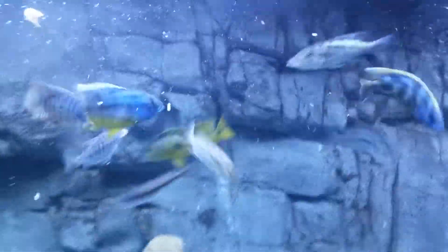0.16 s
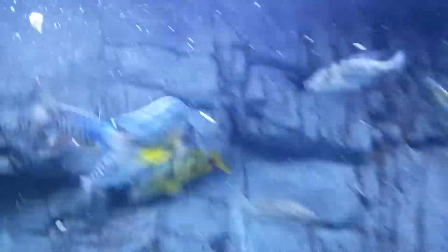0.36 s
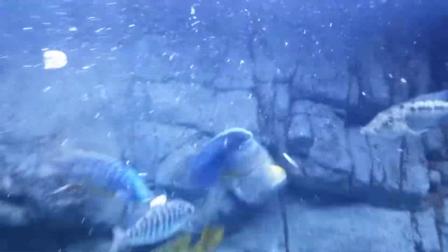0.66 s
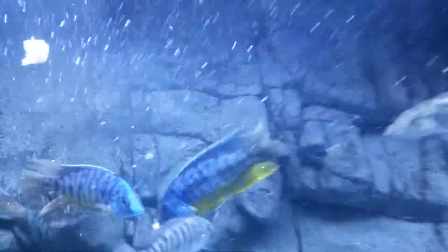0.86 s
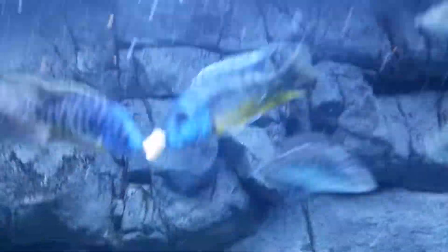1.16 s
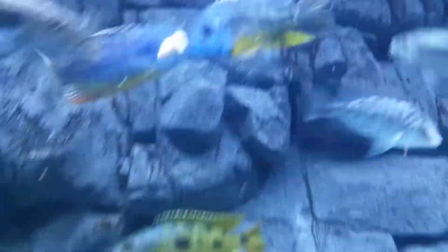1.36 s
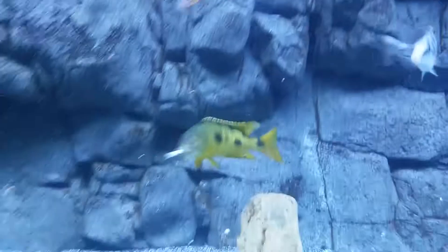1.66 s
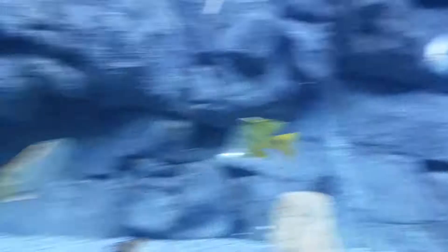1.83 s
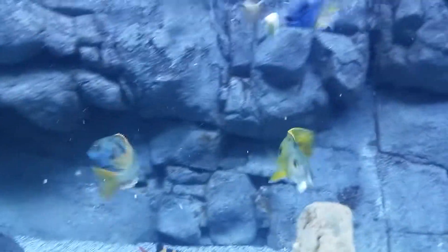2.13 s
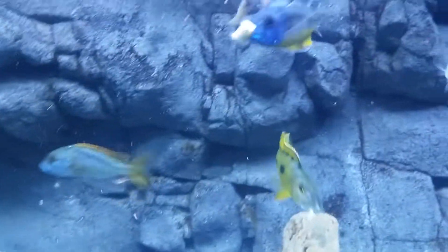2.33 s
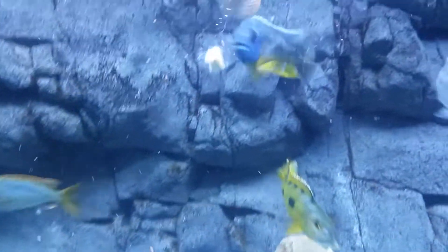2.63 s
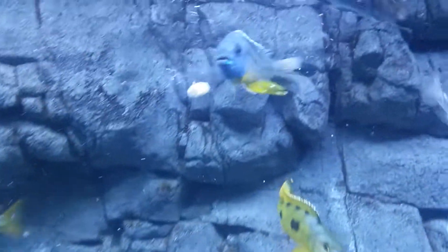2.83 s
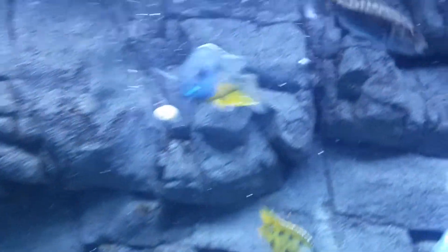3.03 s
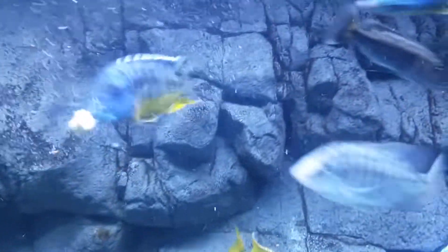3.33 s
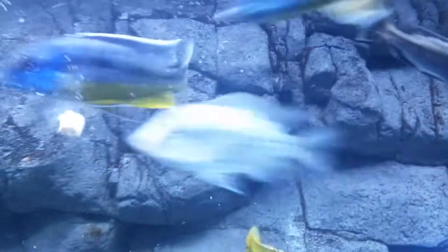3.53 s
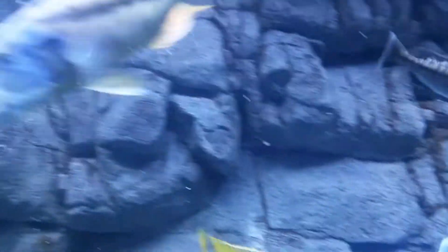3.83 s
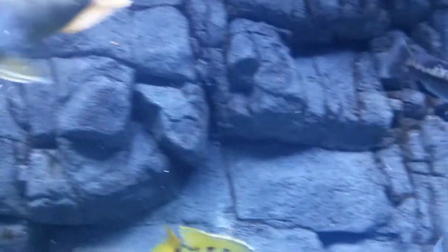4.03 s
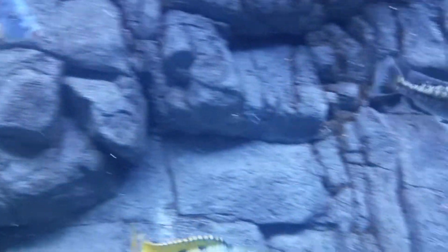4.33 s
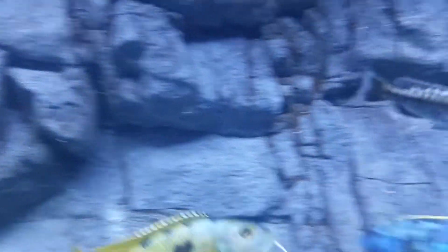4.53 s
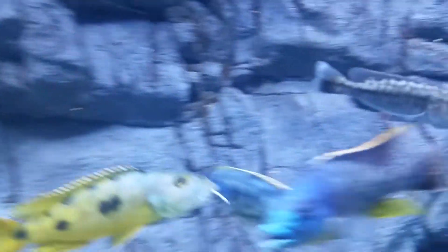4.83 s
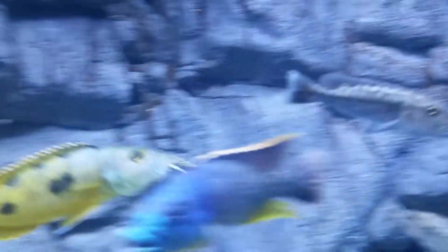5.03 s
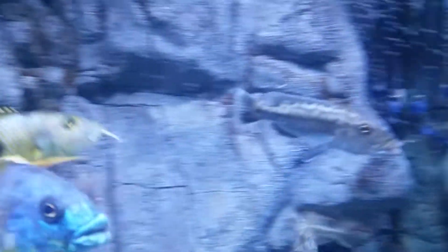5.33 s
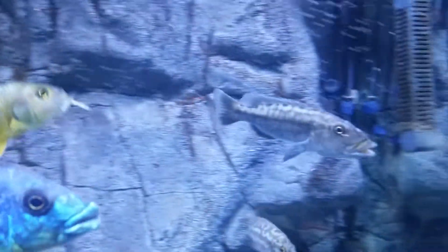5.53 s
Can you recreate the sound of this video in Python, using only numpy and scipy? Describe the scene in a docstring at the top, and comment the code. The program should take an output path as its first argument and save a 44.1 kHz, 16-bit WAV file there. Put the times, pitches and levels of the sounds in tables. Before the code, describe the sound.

Filter water rushes and trickles over a low pump hum at an indoor fish tank, broken by a drip and handling knocks.

```python
"""A hand-held camera moves along a large indoor aquarium. Throughout, filter water rushes and trickles
and the pumps hum on mains harmonics. Fingers rub the camera at 0.3 s; a drip ticks in the room at 0.45 s.
Near 1.4 s: two filter gulps, two light knocks, then a low thump and a faint, bright, dry click on the
left. At 2.0 s a sharp knock lands at the left microphone port. From 2.9 s small bubbles ping, among
soft swishes, one more drip and more rubs; hum and rush swell near 4.7 s as the camera comes close."""
import sys
import numpy as np
from scipy import signal
from scipy.fft import rfft, irfft, next_fast_len
from scipy.io import wavfile
from scipy.ndimage import uniform_filter1d, map_coordinates

SR = 44100
rng = np.random.default_rng(int(sys.argv[2]) if len(sys.argv) > 2 else 0)


def transcribe(signal):
    """Save signal, clipped to [-1, 1], as a 16-bit WAV file at the path in sys.argv[1]."""
    frames = np.atleast_2d(signal).T
    limited = np.clip(frames, -1, 1)
    pcm = np.round(limited * 32767).astype(np.int16)
    wavfile.write(sys.argv[1], SR, pcm)


N = 250488

# Spectral shapes: freq_hz, density_db
RUMBLE_SPECTRUM = [(10, -32), (25, -11), (38, -7), (50, 5.5), (75, 2.5), (100, 6), (140, -1), (200, 2.5),
                   (300, -28), (600, -49.5)]
RUSH_SPECTRUM = [(100, -21), (200, 1.5), (310, 5.5), (400, -2), (580, 0), (740, -2.5), (880, -2),
                 (1120, -4), (1300, -12), (1550, -20.5), (2200, -29), (5000, -53)]
TRICKLE_SPECTRUM = [(900, -52), (1500, -11), (1850, -3.5), (2020, 0), (2130, -2), (2280, -5), (3000, -17.5),
                    (3600, -19.5), (5000, -30.5), (8000, -39)]
FIZZ_SPECTRUM = [(1500, -26), (3400, 5.5), (4500, 1.5), (5600, -5), (7500, -2), (9400, -11.5), (11500, -3),
                 (13500, -5.5), (15500, -2)]
TICK_SPECTRUM = [(500, -10), (1400, -2), (2200, 1), (3100, -3), (4200, -5), (5400, -9), (7200, 2),
                 (8200, 2), (9400, -3), (10800, 2), (13000, -4), (15500, -7)]
RUB_SPECTRUM = [(2000, -32), (6000, -28), (6900, -11), (7900, 1), (9300, -3), (10800, -3), (12200, -10),
                (15500, -21)]
SWISH_SPECTRUM = [(1000, -15), (2200, -2), (3700, 1), (5400, -4), (7000, 0), (8300, -6), (9500, -12),
                  (11000, -9), (13000, -13), (15500, -18)]
# Left-right likeness of the water noise: freq_hz, coherence
COHERENCE = [(60, 0.65), (130, 0.79), (290, 0.73), (640, 0.52), (1400, 0), (3000, 0.061), (7000, 0)]
# Nearness to outlet and pump, trickle strength; used about their means: time_s, level_db
OUTLET_NEARNESS = [(0.0, -62), (0.47, -58.5), (1.69, -61.5), (1.91, -60.5), (2.72, -64), (3.57, -61),
                   (4.0, -62), (4.73, -58), (4.9, -60), (5.68, -60.5)]
PUMP_NEARNESS = [(0.05, -56.5), (0.65, -52.5), (1.62, -58.5), (2.6, -58), (3.7, -55.5), (4.2, -56),
                 (4.7, -51.5), (5.2, -51.5), (5.63, -53.5)]
TRICKLE_STRENGTH = [(0.0, -74), (0.6, -68), (1.03, -67), (1.55, -72), (2.02, -69.5), (2.4, -74.5),
                    (3.29, -74.5), (3.49, -71.5), (4.89, -68.5), (5.68, -72)]
# Pump hum (pan is left minus right throughout): mains_harmonic, level_db, pan_db
HUM_PARTIALS = [(2, -55.5, -3), (4, -63.5, -1.5), (5, -64, -2.5), (6, -70.5, 2), (8, -68, 1), (9, -78, -2),
                (10, -80, -9), (14, -75.5, 8.5), (15, -74, -1), (17, -71.5, -4.5), (18, -78.5, 6.5),
                (19, -76.5, -0.5)]
# Standing waves along the camera's path: mains_harmonic, crest_s, period_s, swing_db
STANDING_WAVES = [(4, 5.24, 1.8, 1.8), (5, 3.27, 1.5, 2.5), (8, 1.91, 3.54, 3.5)]
# Blows on the camera body: start_s, strength_db, pan_db, thump_hz, hardness_hz
CAMERA_KNOCKS = [(1.357, -41, -6, 259, 900), (1.432, -43, 0, 330, 500), (1.674, -26.5, 15, 45, 90),
                 (2.0217, -22.5, 36.5, 129, 1050)]
# A drip, a faint bright dry click on the left, a drip:
# start_s, direct_db, pan_db, crack_t60_s, room_db, tilt_db_per_octave
TICK_EVENTS = [(0.449, -19, -2, 0.0066, -52, 0), (1.752, -42, 8, 0.0029, -88, 1),
               (4.509, -47, -4, 0.0085, -83, 0)]
# Room decay: freq_hz, t60_s
ROOM_DECAY = [(300, 0.45), (2000, 0.81), (7000, 0.36), (15000, 0.28)]
# Filter gulps, soft swishes, finger rubs: centre_s, sigma_s, level_db, pan_db
FILTER_GULPS = [(1.362, 0.018, -53, 1), (1.433, 0.011, -62, 5)]
SOFT_SWISHES = [(.97, 0.019, -77, -6), (1.99, 0.11, -70, -0.5), (3.703, 0.0088, -73, -4),
                (3.952, 0.018, -71, -1), (4.456, 0.01, -71.5, -2), (4.52, 0.058, -68, 0)]
FINGER_RUBS = [(.298, 0.023, -69, -20.5), (.39, 0.038, -83, -9), (4.56, 0.017, -76, -16),
               (4.77, 0.012, -81, -3), (5.289, 0.0061, -81, 5)]
# Bursting bubbles: start_s, pitch_hz, level_db
BUBBLE_PINGS = [(2.945, 6700, -77), (3.038, 7000, -77), (3.839, 8600, -75), (5.285, 7300, -63)]
# Microphone port modes, left list then right: centre_hz, width_hz, gain_db
PORT_MODES = [
    [(6950, 520, 9), (11200, 1500, -18)],
    [(8150, 600, 3), (10900, 1200, -4)],
]

MAINS_HZ, IMPELLER_HZ = 60, 48.2
TIME_S = np.arange(N) / SR


def water(pump_db, outlet_db, trickle_db):
    """Filter flow: tank rumble, rush and trickle throbbing with the pump, housing whine, fine fizz."""
    throb = 1 + 0.099 * np.sin(2 * np.pi * 2 * MAINS_HZ * TIME_S)
    rumble = amp(-62.5 + 0.44 * pump_db) * flow_noise(RUMBLE_SPECTRUM, patchy_db=0.2, pan_db=-0.87)
    rush = amp(-56.5 + 0.96 * outlet_db) * flow_noise(RUSH_SPECTRUM, patchy_db=1.24, pan_db=-2.2)
    trickle = amp(-68 + 0.96 * trickle_db) * flow_noise(TRICKLE_SPECTRUM, patchy_db=1.9, pan_db=-1.5)
    housing = filtered(rng.standard_normal(N), lambda f: resonance(f, hz=2028, width_hz=137) ** 2)
    whine = amp(-77 + 0.96 * trickle_db) * unit_rms(housing)
    fizz = amp(-82 + 3.2 * outlet_db) * flow_noise(FIZZ_SPECTRUM, patchy_db=0.8, pan_db=-0.8)
    return rumble + throb * (rush + trickle) + whine + fizz


def pump_hum(near_db):
    """Mains harmonics; the camera crosses standing waves, and the short waves waver at random."""
    standing_db = {harmonic: swing_db * np.cos(2 * np.pi * (TIME_S - crest_s) / period_s)
                   for harmonic, crest_s, period_s, swing_db in STANDING_WAVES}
    delay_s = np.array([[90e-6], [-90e-6]])  # pump to the right
    out = np.zeros((2, N))
    for harmonic, level_db, pan_db in HUM_PARTIALS:
        hz = MAINS_HZ * harmonic
        waver = min(hz / 900, 1)
        growth = 0.95 if harmonic <= 4 else 0.43
        swell_db = growth * near_db + standing_db.get(harmonic, 0) + 0.88 * waver * wobble(2.16)
        phase = 2 * np.pi * (hz * (TIME_S - delay_s) + rng.random()) + 1.08 * waver * wobble(1.66)
        out += amp(level_db + swell_db) * panned(pan_db) * np.sqrt(2) * np.sin(phase)
    return out


def impeller(near_db):
    """Unbalanced impeller: a deep, wavering drone, heard only close by."""
    phase = 2 * np.pi * IMPELLER_HZ * TIME_S + 0.5 * wobble(0.67)
    level_db = -68 + 2.3 * near_db + 2.6 * wobble(3.5)
    return amp(level_db) * panned(0.16) * np.sin(phase)


def knocks():
    """Blows on the camera: a damped thump at the near port, a tick through the casing to both."""
    def casing(f):
        return (amp(-23) * resonance(f, 2040, 300) + amp(-27.5) * resonance(f, 4460, 1500)
                + amp(-28.5) * resonance(f, 6400, 2000))

    out = np.zeros((2, N))
    for start_s, strength_db, pan_db, thump_hz, hardness_hz in CAMERA_KNOCKS:
        blow = np.zeros(N)
        blow[round(start_s * SR)] = amp(strength_db + 33)
        thump = lambda f: panned(pan_db) * resonance(f, thump_hz, 0.96 * thump_hz) / (1 + 1j * f / 3000)
        tick = lambda f: amp(abs(pan_db) / 2) * amp([[0], [-12]]) * casing(f)
        # 35 Hz high-pass, hardness low-pass, 9 kHz roll-off
        contact = lambda f: 1j * f / (35 + 1j * f) / (1 + 1j * f / hardness_hz) / (1 + (f / 9000) ** 6)
        out += filtered(blow, lambda f: (thump(f) + tick(f)) * contact(f))
    return out


def drips_and_click(crack_rise_s=0.0014, room_rise_s=0.0029):
    """Short cracks of noise; the hard room answers the two drips, the click stays almost dry."""
    t = np.arange(SR // 2) / SR
    freq_hz = np.fft.rfftfreq(len(t), 1 / SR)
    octaves = np.log2(np.maximum(freq_hz, 1500) / 7000)
    out = np.zeros((2, N + SR))
    for start_s, direct_db, pan_db, crack_t60_s, room_db, tilt_db_per_octave in TICK_EVENTS:
        noise = rng.standard_normal((2, 2, len(t)))
        direct, diffuse = irfft(rfft(noise) * amp(tilt_db_per_octave * octaves), len(t))
        crack = direct * amp(direct_db - 60 * t / crack_t60_s) * (1 - np.exp(-t / crack_rise_s))
        band_hz, age_s, bands = signal.stft(diffuse, SR, nperseg=256)
        decay = amp(-60 * age_s / log_interp(ROOM_DECAY, band_hz)[:, None])
        tail = signal.istft(bands * decay, SR, nperseg=256)[1][:, :len(t)]
        tail *= amp(room_db) * (1 - np.exp(-t / room_rise_s))
        out[:, round(start_s * SR):][:, :len(t)] += panned(pan_db) * crack + tail
    return coloured(out[:, :N], TICK_SPECTRUM)


def strokes(events, spectrum, rough_db):
    """Gulps, swishes or rubs: grainy noise under Gaussian swells."""
    swell = sum(amp(level_db) * panned(pan_db) * np.exp(-0.5 * ((TIME_S - centre_s) / sigma_s) ** 2)
                for centre_s, sigma_s, level_db, pan_db in events)
    grains = rng.standard_normal((2, N)) * amp(rough_db * wobble(160))
    return swell * unit_rms(coloured(grains, spectrum))


def bubbles(t60_s=0.035, rise_s=0.002):
    """Each bursting bubble rings briefly at its own pitch."""
    t = np.arange(SR // 10) / SR
    envelope = amp(-60 * t / t60_s) * (1 - np.exp(-t / rise_s))
    out = np.zeros(N + SR)
    for start_s, pitch_hz, level_db in BUBBLE_PINGS:
        out[round(start_s * SR):][:len(t)] += amp(level_db) * envelope * np.sin(2 * np.pi * pitch_hz * t)
    return out[:N]


def microphone_hiss(level_db=-88):
    """Steady white noise, independent per channel."""
    return amp(level_db) * rng.standard_normal((2, N))


def flow_noise(spectrum, patchy_db, pan_db):
    """Diffuse stereo noise with random time-frequency patches; rms 1 before panning."""
    def mid_side(f):
        angle = np.arccos(log_interp(COHERENCE, f)) / 2
        return amp(log_interp(spectrum, f)) * np.array([np.cos(angle), np.sin(angle)])

    bands = signal.stft(rng.standard_normal((2, N)), nperseg=512)[2]
    patches = uniform_filter1d(rng.standard_normal(bands.shape[1:]), size=4, axis=0)
    patches = unit_rms(uniform_filter1d(patches, size=8, axis=1))
    noise = signal.istft(bands * amp(patchy_db * patches), nperseg=512)[1][:, :N]
    mid, side = filtered(noise, mid_side)
    return unit_rms(np.array([mid + side, mid - side])) * panned(pan_db)


def amp(db):
    """Decibels to gain."""
    return 10 ** (np.asarray(db) / 20)


def unit_rms(x):
    """x at rms 1."""
    return x / np.sqrt(np.mean(x ** 2) + 1e-20)


def panned(pan_db):
    """Left and right gains."""
    return amp([[pan_db / 2], [-pan_db / 2]])


def log_interp(points, hz):
    """Table value at hz, on a log frequency axis."""
    knots_hz, values = np.transpose(points)
    return np.interp(np.log(hz + 1), np.log(knots_hz + 1), values)


def swing(points):
    """Per-sample level in dB about its mean."""
    level_db = np.interp(TIME_S, *np.transpose(points))
    return level_db - level_db.mean()


def wobble(rate_hz):
    """Smooth random curve, rate_hz knots a second."""
    return map_coordinates(rng.standard_normal(512), [TIME_S * rate_hz], mode="mirror")


def filtered(x, response):
    """x through a complex frequency response."""
    size = next_fast_len(N + SR // 2)
    return irfft(rfft(x, size) * response(np.fft.rfftfreq(size, 1 / SR)), size)[..., :N]


def resonance(f, hz, width_hz):
    """Causal response of one mode, 1 at its centre."""
    return 1j * f * width_hz / (hz * hz - f * f + 1j * f * width_hz)


def coloured(x, spectrum):
    """x through a spectrum, keeping the power of white noise."""
    return filtered(x, lambda f: unit_rms(amp(log_interp(spectrum, f))))


def scene():
    """Water and pump swell as the camera nears; handling sounds and hiss lie on top."""
    pump_db = swing(PUMP_NEARNESS)
    tank = water(pump_db, swing(OUTLET_NEARNESS), swing(TRICKLE_STRENGTH))
    tank += pump_hum(pump_db) + impeller(pump_db) + bubbles()
    ticks = drips_and_click()
    gulps = strokes(FILTER_GULPS, RUSH_SPECTRUM, rough_db=2.5)
    swishes = strokes(SOFT_SWISHES, SWISH_SPECTRUM, rough_db=2.5)
    rubs = strokes(FINGER_RUBS, RUB_SPECTRUM, rough_db=2.0)
    return tank + ticks + gulps + swishes + rubs + knocks() + microphone_hiss()


def record(dry):
    """Each microphone port rings in the treble; band limit 15.8 kHz."""
    def port(f, modes):
        return 1 + sum(amp(gain_db) * resonance(f, hz, width_hz) for hz, width_hz, gain_db in modes)

    return filtered(dry, lambda f: np.array([port(f, modes) for modes in PORT_MODES]) * (f < 15800))


dry = scene()
out = record(dry)
transcribe(out)
```